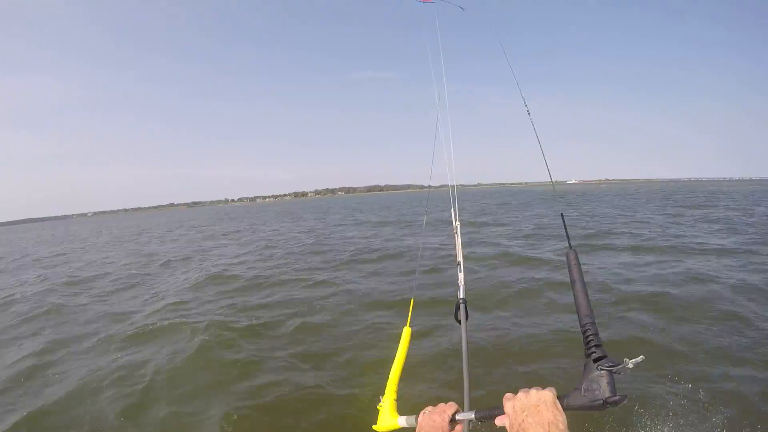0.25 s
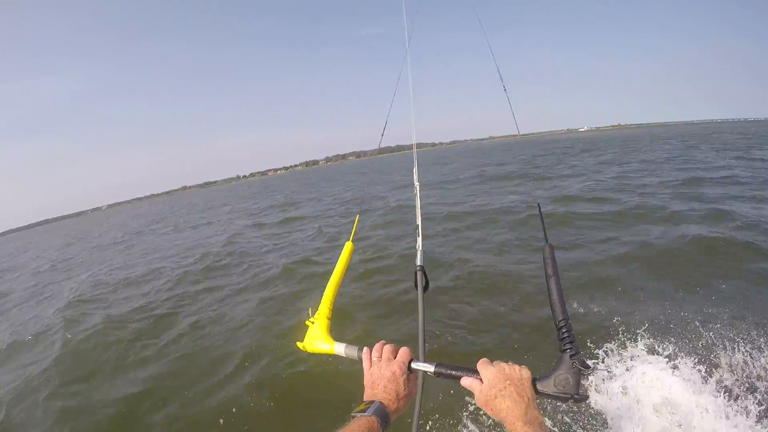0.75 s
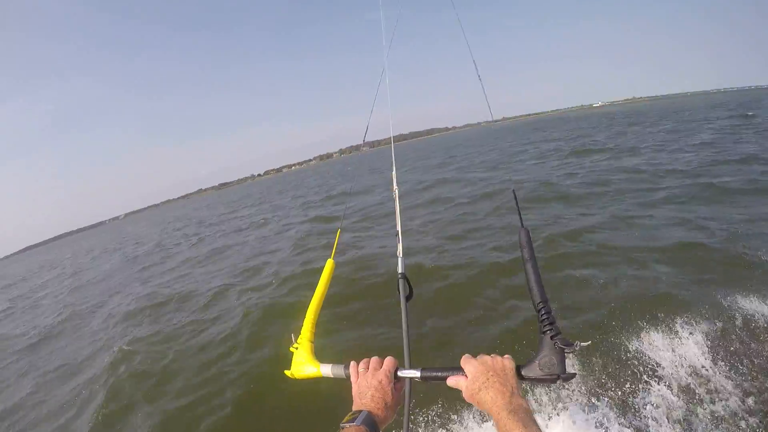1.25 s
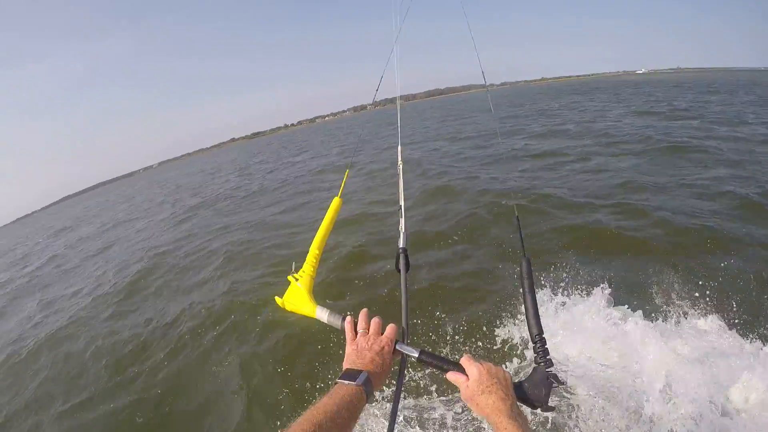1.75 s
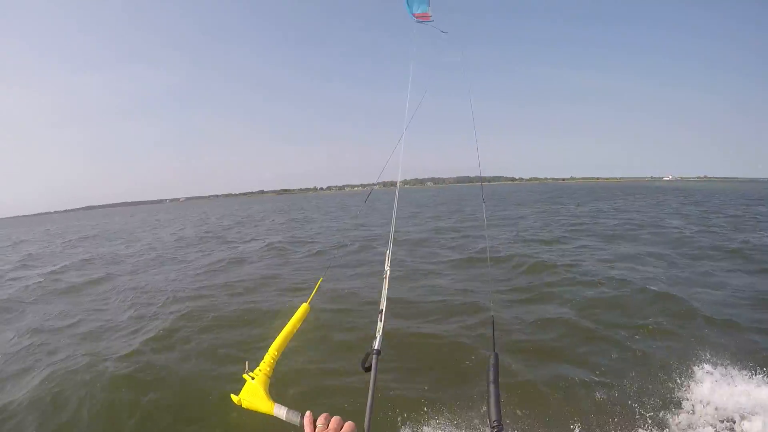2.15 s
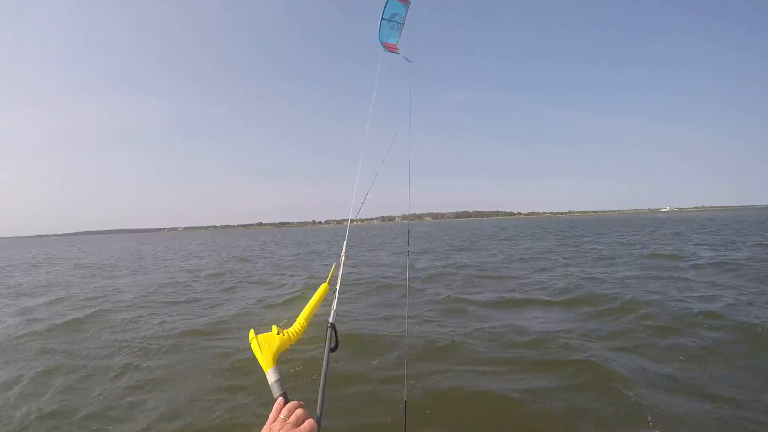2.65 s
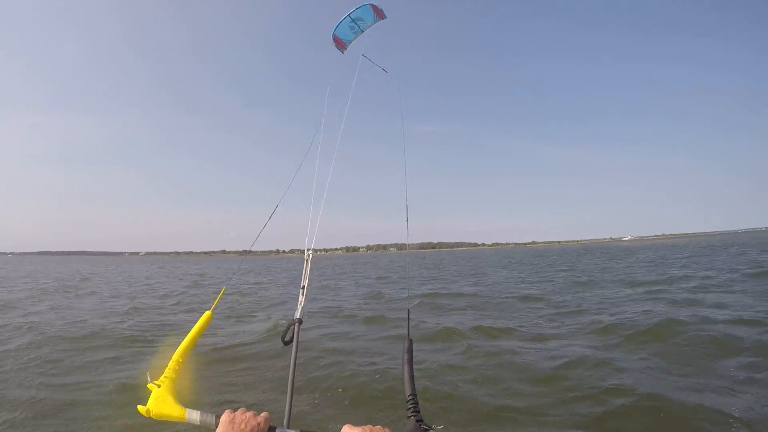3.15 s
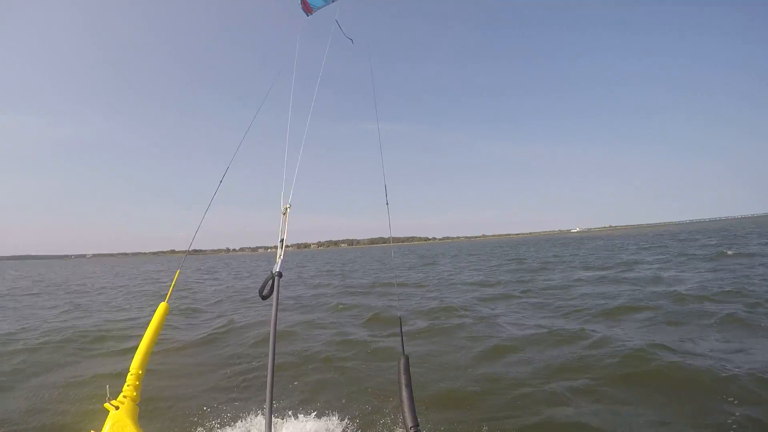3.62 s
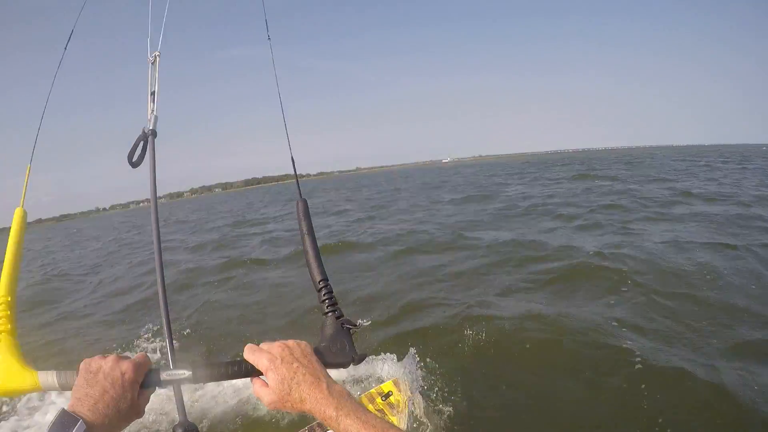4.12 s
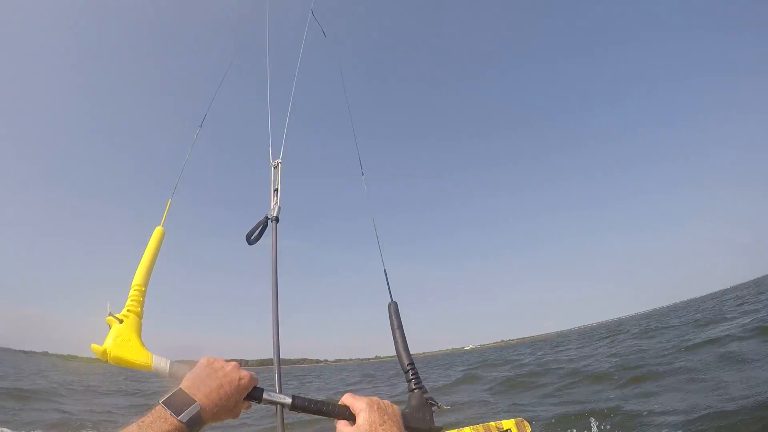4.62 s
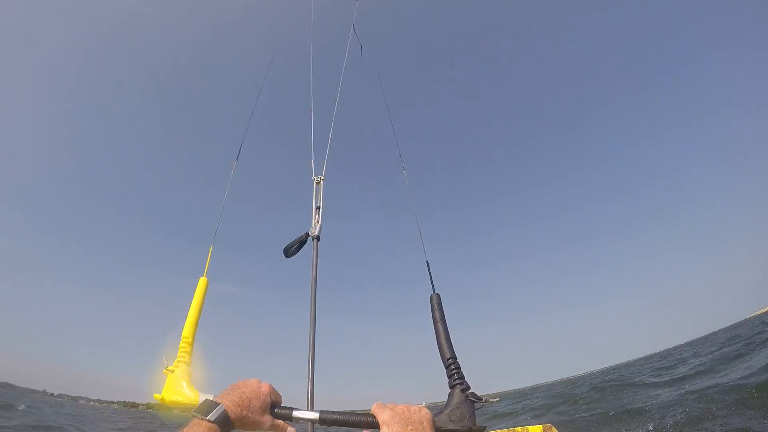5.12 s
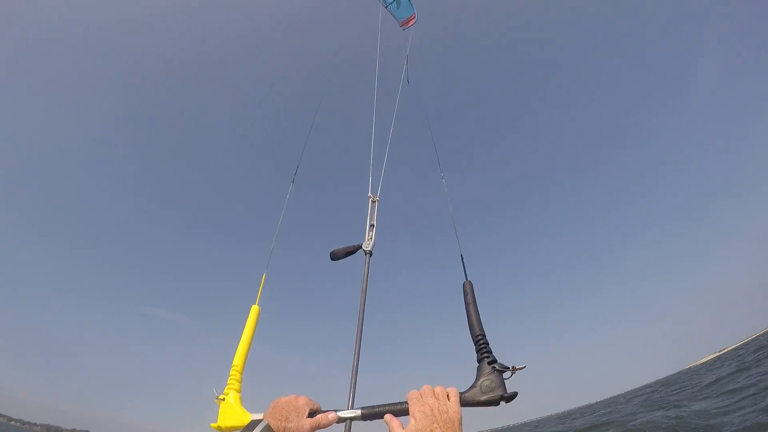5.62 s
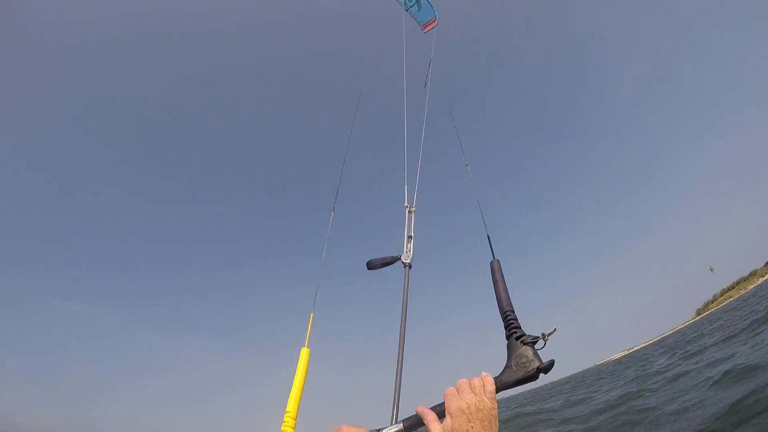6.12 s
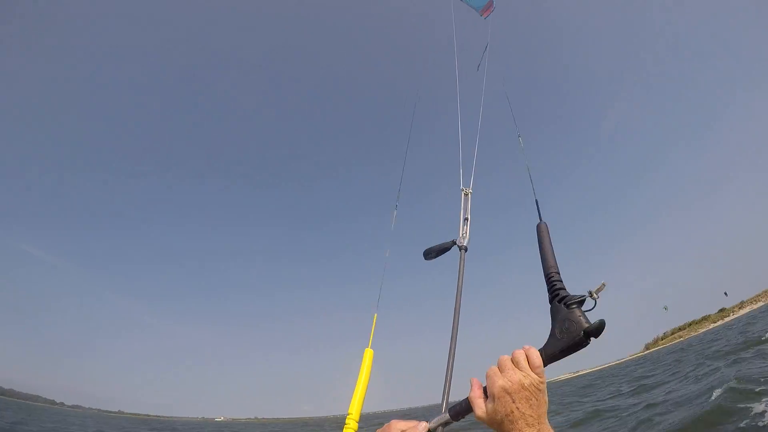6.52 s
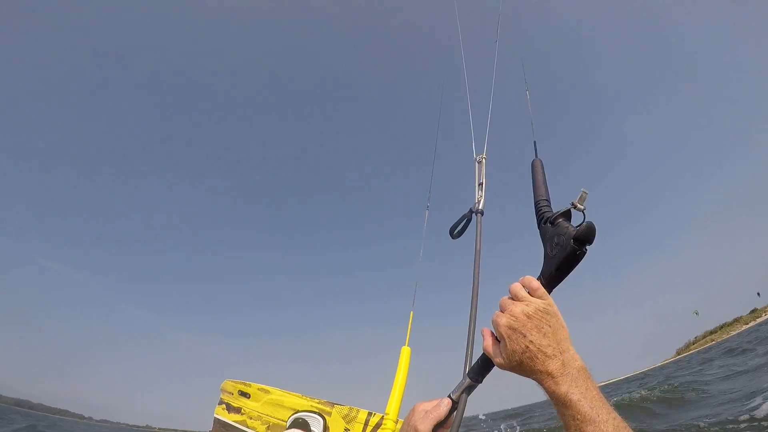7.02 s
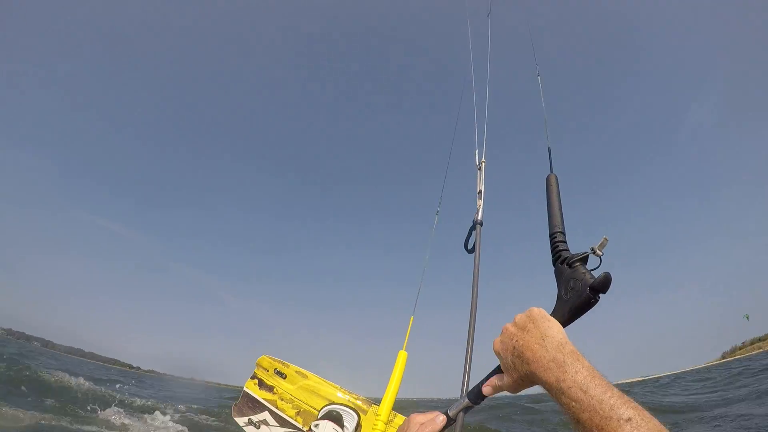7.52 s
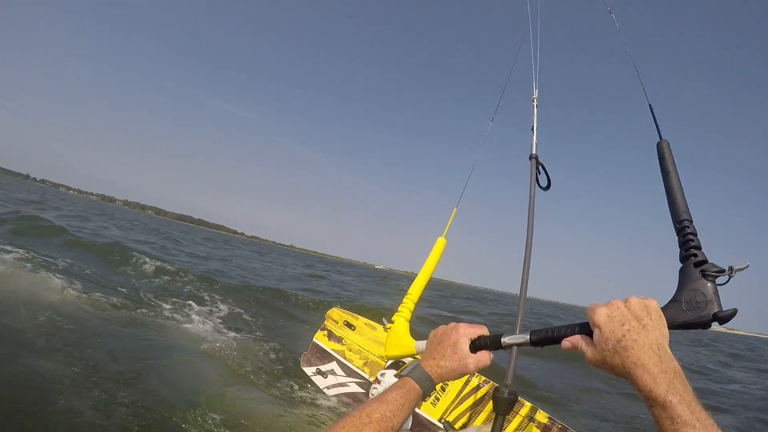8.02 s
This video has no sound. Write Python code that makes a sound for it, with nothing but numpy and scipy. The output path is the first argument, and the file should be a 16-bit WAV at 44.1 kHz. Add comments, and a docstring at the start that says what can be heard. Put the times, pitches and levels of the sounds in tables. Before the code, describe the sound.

Wind rumbles low on an encased microphone as a kiteboard washes and hisses over chop, then spray slaps and patters hard on the case.

```python
"""A kiteboard planes over choppy shallow water, heard from a camera in a waterproof case on the rider.
From the start filtered noise rumbles as wind on the case, under a bubbling wash and hissing spray made of
random impacts that swell at each chop; for the first seconds close spray also excites a narrow case resonance.
Past the middle, decaying sine bubbles plop, two faint slaps land and thin noise ticks prick the wet case.
Near the end sheets of spray hit it: a patter of drops, hard slaps of ringing modes and wet plops."""
import sys
import numpy as np
from scipy import signal
from scipy.fft import rfft, irfft, next_fast_len
from scipy.io import wavfile
from scipy.ndimage import uniform_filter1d

SR = 44100
rng = np.random.default_rng(int(sys.argv[2]) if len(sys.argv) > 2 else 0)


def bounce(signal):
    """Save signal as a 16-bit WAV file at the path given by the first command-line argument."""
    frames = np.transpose(np.atleast_2d(signal))
    limited = np.clip(frames, -1, 1)
    pcm = np.round(limited * 32767).astype(np.int16)
    wavfile.write(sys.argv[1], SR, pcm)


N = 364266
TIME = np.arange(N) / SR


# the board planing between chops, before trims: [t/s, wash level/dB, spray level/dB]
PLANING = [(0.0, -44.5, -42.5), (0.4, -50, -45), (1.7, -48.5, -46.5), (2.3, -48.5, -45.0),
           (3.2, -47.5, -49), (4.4, -45, -48.5), (5.1, -45, -47.5), (5.4, -52, -54.0), (6.0, -49.5, -55),
           (6.5, -48, -54.0), (7.4, -46.0, -51), (7.9, -49.5, -60), (8.26, -46.5, -50.5)]
# chops that the board cuts through: [crest t/s, length/s, wash change/dB, spray change/dB]
CHOPS = [(.19,0.092,1.5,2.5), (.67,.33,8,4.5), (1.11,.31,5.5,6.5), (1.44,0.2,5.5,7.5), (1.87,0.1,9.5,2),
         (2.11,0.36,6.5,6.5), (2.3,0.22,5,1), (2.52,0.28,4,4.5), (2.99,0.53,4.5,1.5), (3.59,0.41,4,2),
         (3.79,.25,5.5,8.5), (4.66,0.081,1.5,2.5), (4.87,0.29,5.5,4.5), (5.61,.13,4.5,5), (5.91,0.28,7,5),
         (6.72,0.046,1,0), (6.9,0.12,3,6), (7.14,0.067,4.5,1.5)]
# low churning under the hull between chops: [t/s, level/dB]
HULL_CHURN = [(0, -49.5), (1.7, -54.5), (2.3, -55), (3.3, -51.5), (4.4, -53.5), (5.0, -49.5), (5.45, -60.5),
              (6.05, -54.5), (6.8, -54.5), (8.26, -54.5)]
# tone of the churning, the wash and the spray through the case: [f/Hz, relative level/dB]
CHURN_COLOUR = [(200, -9), (400, -4), (520, -2), (700, 0), (810, 1), (900, 0), (1020, -1), (1200, -1),
                (1400, -3.5), (2000, -10)]
WASH_COLOUR = [(900, -26), (1300, -7), (1540, 0.5), (1720, -1), (2020, 2.5), (2400, -0.5), (2680, -5),
               (2950, -11.5), (3500, -12), (4500, -25)]
SPRAY_COLOUR = [(2000, -15.5), (2500, 1), (2900, -12.5), (3550, -7), (4350, 2), (5300, -3.5), (6000, -6),
                (6700, 1), (7600, -9), (8600, -13), (9800, -9), (11800, -17.5), (13600, -15.5),
                (15500, -20)]  # also colours the sprinkle
CHURN_FOLLOWS = 0.56  # dB of churning per dB that a chop adds to the wash
# mist level when the spray table and chops sum to the cruise level; dB of mist per dB of spray
MIST_DB, CRUISE_SPRAY_DB, MIST_FOLLOWS = -56, -45, 1.05


def board(wash_trim_db=-1.5, spray_trim_db=0.12, slosh_db=1.0, surge_db=0.24, shimmer_db=1.0,
          churn_bubbles_db=-13, wash_bubbles_db=-8, mist_above_hz=7800):
    """The hull churns water, bubbles burst in the wash and spray rains on the sea, all louder at each chop."""
    wash_change, spray_change = swells(CHOPS)
    wash_db, spray_db = curves(PLANING)
    churn_db, = curves(HULL_CHURN)
    wash_db = wash_db + wash_change + slosh_db * walk(20)
    spray_db = spray_db + spray_change
    churn_db = churn_db + CHURN_FOLLOWS * wash_change + slosh_db * walk(12)
    mist_db = MIST_DB + MIST_FOLLOWS * (spray_db - CRUISE_SPRAY_DB)

    froth = bubbles(count=4000, low_hz=399.5, high_hz=2803, cycles=2.48, spread_db=0.5)
    churn_source = droplets(per_s=3000, spread_db=1.0) + undb(churn_bubbles_db) * froth
    churn = colour(churn_source, CHURN_COLOUR) * undb(churn_db)
    wash_source = droplets(per_s=4000, spread_db=2.5) + undb(wash_bubbles_db) * froth
    wash = colour(wash_source, WASH_COLOUR) * undb(wash_db + wash_trim_db)

    shimmering_drops = droplets(per_s=16000, spread_db=3.0) * undb(shimmer_db * walk(35))
    hiss = colour(shimmering_drops, SPRAY_COLOUR)
    # hard carving tears the spray into a finer mist: the top band grows slightly faster
    high_pass = signal.butter(4, mist_above_hz, "high", fs=SR, output="sos")
    mist = signal.sosfiltfilt(high_pass, hiss)
    coarse_spray = unit(hiss - mist) * undb(spray_db + spray_trim_db)
    spray = coarse_spray + unit(mist) * undb(mist_db)
    return (churn + wash + spray) * undb(surge_db * walk(25))


# sheets of spray that land on the case: [t/s at full level, level/dB, length at full level/s]
SHEETS = [(7.226, -28.5, 0.063), (7.333, -33.5, 0.15), (7.547, -35, 0.033), (7.643, -41, 0.06),
          (7.73, -36.5, 0.066), (7.843, -41.5, 0.033)]
# tone of the drumming on the case: [f/Hz, relative level/dB]
PATTER_COLOUR = [(70, -6), (110, 12), (170, -12), (300, -4), (410, -13), (520, -11), (880, -6),
                 (1270, -8.5), (1500, 0), (1780, -0.5), (2100, 0), (2650, -4), (3300, -17), (6700, -16),
                 (8500, -31), (14000, -40)]
SHEET_ATTACK_S, SHEET_RELEASE_S = 0.02, 0.039  # e-folding times before and after full level
DRIZZLE_DB = -52.5  # the light patter that never stops


def patter(clump_db=2.5, gurgle_db=-6.0):
    """Sheets of spray drum on the case in clumps and gurgle as they run off, over a light, steady drizzle."""
    power = undb(DRIZZLE_DB) ** 2
    for s, db, length in SHEETS:
        before = np.maximum(s - TIME, 0) / SHEET_ATTACK_S
        after = np.maximum(TIME - s - length, 0) / SHEET_RELEASE_S
        envelope = np.exp(-np.minimum(before + after, 20))
        power = power + (undb(db) * envelope) ** 2
    drops = droplets(per_s=1800, spread_db=3.0) * undb(clump_db * walk(140))
    gurgle = bubbles(count=2600, low_hz=507, high_hz=3270, cycles=1.67, spread_db=2.5)
    return colour(drops + undb(gurgle_db) * gurgle, PATTER_COLOUR) * np.sqrt(power)


# big drops slapping the case: [t/s, push level at the crest/dB, time to flatten/s (crest at half of it)]
SLAPS = [(4.915, -36, .003), (4.936, -38, .002), (7.201, -31, 0.0024), (7.223, -17, 0.0039),
         (7.231, -28, 0.0039), (7.242, -21, 0.0067), (7.28, -20, 0.0038), (7.365, -31, 0.0042),
         (7.387, -36, 0.0033), (7.445, -15, 0.003), (7.522, -27.5, 0.004), (7.684, -34, 0.002),
         (7.741, -20, 0.0019), (7.811, -32, 0.0033), (7.891, -31, 0.0023)]
# ringing modes of the case: [f/Hz, relative level/dB, time to fall 60 dB/s]
CASE_MODES = [(900, -31, 0.037), (1590, 6.5, 0.03), (2140, 9, 0.015), (2750, -14, 0.0075),
              (3520, -10, 0.023), (4270, -16, 0.013)]
# tone of the wet splat: [f/Hz, relative level/dB]
SPLAT_COLOUR = [(400, -15), (900, -8), (1600, 3.5), (2300, 4.5), (2950, -1), (3500, -12), (4300, -11),
                (6500, -23), (8500, -50), (15000, -29)]


def slaps(splat_db=1):
    """Each big drop pushes on the case in a ragged burst: a wet splat, and the modes of the case ring."""
    t = TIME[:SR // 20]
    ringing = np.zeros(len(t))
    for hz, db, t60 in CASE_MODES:
        ringing += undb(db - 60 * t / t60) * np.sin(2 * np.pi * hz * t)
    push = np.zeros(N)
    for s, db, flatten in SLAPS:
        swell = 2 * t / flatten * np.exp(1 - 2 * t / flatten)
        add(push, s, undb(db) * swell * rng.choice([-1, 1], len(t)))
    ring = unit(signal.fftconvolve(push, ringing)[:N])
    splat = undb(splat_db) * colour(push, SPLAT_COLOUR)
    return unit(ring + splat) * push.std()  # as strong overall as the push


# drops that trap a pocket of air:
# [t/s, level/dB at the peak before ragging, f/Hz at the loudness peak, midway through the glide]
PLOPS = [(4.645, -31, 2460), (4.795, -26, 2040), (4.857, -31, 2080), (4.916, -29.5, 1570),
         (4.937, -28.5, 2670), (5.027, -44, 290), (5.287, -38, 1530), (5.329, -33.5, 2040),
         (5.602, -36, 2330), (5.672, -35, 1780), (5.810, -35, 2200), (5.943, -36, 2060),
         (6.038, -34.5, 2100), (6.113, -33.5, 1880), (6.203, -37, 2040), (6.711, -32, 1910),
         (7.366, -23.5, 2040), (7.447, -11, 2440), (7.489, -31, 1250), (7.502, -30, 2120),
         (7.519, -22, 2830), (7.557, -23.5, 776), (7.57, -18.5, 1516), (7.665, -30, 2830),
         (7.686, -28.5, 2420), (7.699, -30, 3000), (7.734, -19.5, 1620), (7.742, -26.5, 3500),
         (7.768, -26, 1500), (7.844, -24.5, 895), (7.871, -30.5, 510), (8.03, -34, 1450),
         (8.118, -36, 2010)]


def plops(cycles=2.76, ragged_db=-9):
    """The loudest bubbles, right at the case; the breaking water makes each ring a little ragged."""
    out = np.zeros(N)
    for s, db, hz in PLOPS:
        add(out, s, undb(db) * bubble(hz, cycles))
    return out * (1 + undb(ragged_db) * walk(1200))


# spray thrown up close to the case while the board edges hard: [t/s, level/dB]
CLOSE_SPRAY = [(0, -66), (.45, -54), (.68, -45), (.97, -51.5), (1.46, -55), (2.1, -65), (2.55, -48),
               (2.7, -73)]


def close_spray(ring_hz=2530, width_hz=330):
    """Fine spray close by keeps one resonance of the case sounding."""
    close_db, = curves(CLOSE_SPRAY)
    edges_hz = [ring_hz - width_hz / 2, ring_hz + width_hz / 2]
    mode = signal.butter(2, edges_hz, "band", fs=SR, output="sos")
    ringing = signal.sosfilt(mode, droplets(per_s=6000, spread_db=3.5))
    return unit(ringing) * undb(close_db)


# scattered drops that fall close to the case: [t/s, level/dB]
SPRINKLE = [(0, -68), (4.4, -60), (4.8, -49), (5.3, -59), (5.8, -55), (6.4, -63.5), (7.3, -50),
            (7.95, -60.5), (8.26, -50.5)]


def sprinkle():
    """Single small drops tick close by, each a short high bubble."""
    sprinkle_db, = curves(SPRINKLE)
    ticks = bubbles(count=2200, low_hz=3220, high_hz=11500, cycles=3.5, spread_db=4.0)
    return colour(ticks, SPRAY_COLOUR) * undb(sprinkle_db)


# the tiniest drops, once the case is wet: start, level before the high-pass, e-folding decay
PINPRICKS_FROM_S, PINPRICK_DB, PINPRICK_DECAY_S = 4.5, -40, 0.00054


def pinpricks(count=9, above_hz=8500):
    """Now and then a tiny drop hits the case with a thin, sharp tick of decaying noise."""
    out = np.zeros(N)
    t = TIME[:SR // 200]
    decay = undb(PINPRICK_DB) * np.exp(-t / PINPRICK_DECAY_S)
    for s in rng.uniform(PINPRICKS_FROM_S, TIME[-1], count):
        add(out, s, decay * rng.standard_normal(len(t)))
    return signal.sosfilt(signal.butter(2, above_hz, "high", fs=SR, output="sos"), out)


# the air stream on the case between gusts, before trims: [t/s, slow sway level/dB, buffeting level/dB]
WIND = [(0.0, -30.5, -28), (0.6, -31, -31), (0.85, -29, -34.5), (1.6, -29, -33), (2.3, -30, -36.5),
        (2.85, -34, -40.5), (3.6, -30, -43), (4.3, -27, -35), (5.1, -23, -32), (5.8, -25, -39),
        (6.6, -33.5, -36), (7.0, -21, -37.5), (7.6, -22.5, -33), (8.26, -25, -39)]
# gusts that strike the case: [peak t/s, length/s, sway change/dB, buffeting change/dB]
GUSTS = [(0.71,0.06,-1,13), (1.28,0.095,11.5,1), (1.58,0.26,8.5,-2), (1.75,.04,-5,10.5), (1.99,0.3,12,1.5),
         (2.23,0.088,10,-1), (2.37,0.087,14,5), (2.64,0.34,10.5,4), (2.99,0.096,17.5,0),
         (3.32,0.073,13.5,17), (3.44,0.097,13.5,5), (3.74,0.065,-3,15.5), (4.12,.05,7,4),
         (4.25,0.083,5,6.5), (4.75,0.1,14,2), (5.13,0.085,8.5,2), (5.34,0.044,11,3), (5.47,.07,1,12),
         (6.06,.12,11,3), (6.39,0.36,14.5,3.5), (6.76,0.071,-2,6.5), (7.27,0.29,0.5,16), (7.47,0.086,3,8),
         (7.81,0.21,3,7)]
# fine flutter between gusts, before its trim: [t/s, level/dB]
EDDIES = [(0, -47), (.4, -45.5), (1.2, -46.5), (2.2, -50.5), (3.1, -55.5), (3.6, -51), (4.1, -55),
          (4.95, -51), (5.7, -52.5), (7.0, -53.5), (7.25, -46.5), (7.7, -54), (8.26, -51)]
# tone of the sway, the buffeting and the flutter through the case: [f/Hz, relative level/dB]
SWAY_COLOUR = [(10, -10.5), (16, 1.5), (27, -2.5), (40, -11.5), (52, -14.5), (80, -38)]
WIND_COLOUR = [(32, -17.5), (45, -2), (60, -0.5), (74, -6.5), (90, -14.5), (110, -26.5), (160, -43)]
EDDY_COLOUR = [(80, -15), (115, 2.5), (160, -4), (220, -5.5), (300, -9), (400, -14), (800, -38)]
FLUTTER_FOLLOWS = 0.35  # dB of flutter per dB that gusts and lulls change the buffeting


def wind(flutter_db=2.0, sway_trim_db=-2.0, buffet_trim_db=-1.0, eddies_trim_db=0.13, lull_db=1.4):
    """Large eddies rock the case, middling ones buffet it, small ones flutter on top; gusts move all three."""
    large_db, wind_db = curves(WIND)
    eddy_db, = curves(EDDIES)
    large_change, wind_change = swells(GUSTS)
    wind_change = wind_change + lull_db * walk(14)
    sway = gusts(SWAY_COLOUR, evenness=0.66) * undb(large_db + large_change + sway_trim_db)
    buffet = gusts(WIND_COLOUR, evenness=0.55) * undb(wind_db + wind_change + buffet_trim_db)
    flutter = colour(rng.standard_normal(N) * undb(flutter_db * walk(40)), EDDY_COLOUR)
    flutter_level_db = eddy_db + eddies_trim_db + FLUTTER_FOLLOWS * wind_change
    return sway + buffet + flutter * undb(flutter_level_db)


def gusts(points, evenness):
    """Turbulent pressure as coloured noise; eddies shed in turn are evened out in strength (1 = fully)."""
    pressure = colour(rng.standard_normal(N), points)
    strength = np.sqrt(uniform_filter1d(pressure ** 2, size=3300))  # about 75 ms
    return unit(pressure / strength ** evenness)


def bubble(hz, cycles, glide=0.055):
    """A trapped air pocket swells, rings for a few cycles and rises a little in pitch."""
    age = np.arange(int(8 * cycles * SR / hz)) * hz / (cycles * SR)  # 1 at the peak
    gliding_hz = hz * (1 + glide * np.tanh(age - 1))
    phase = 2 * np.pi * np.cumsum(gliding_hz) / SR
    return age * np.exp(1 - age) * np.sin(phase)


def bubbles(count, low_hz, high_hz, cycles, spread_db):
    """A swarm of bubbles of all sizes at random moments; rms 1."""
    out = np.zeros(N)
    for when, pitch, loudness, length in rng.random((count, 4)):
        size = undb(spread_db * min(-np.log(1 - loudness), 3.5))  # many small, few large
        hz = low_hz * (high_hz / low_hz) ** pitch
        add(out, when * TIME[-1], size * bubble(hz, cycles * (.5 + length)))
    return unit(out)


def droplets(per_s, spread_db):
    """Tiny impacts at random moments, many small and a few large; rms 1."""
    lands = rng.random(N) < per_s / SR
    size = undb(spread_db * np.minimum(rng.exponential(size=N), 5))
    return unit(lands * size * rng.choice([-1, 1], N))


def swells(table):
    """Each event shifts two levels in a smooth bell, each by its own change in dB."""
    out = np.zeros((2, N))
    for s, length, *changes_db in table:
        near = np.abs(TIME - s) < 2 * length
        bell = np.exp(-(2 * (TIME[near] - s) / length) ** 2)
        out[:, near] += np.outer(changes_db, bell)
    return out


def walk(rate):
    """Random levels held 1 / rate s and slewed twice; rms 1."""
    k = int(SR / rate)
    held = np.repeat(rng.standard_normal(N // k + 1), k)
    slewed = uniform_filter1d(uniform_filter1d(held, k), k)
    return unit(slewed[:N])


def colour(x, points):
    """Causal minimum-phase filter with the given (Hz, dB) response; the result has rms 1."""
    size = next_fast_len(N + SR // 2, True) // 2 * 2
    hz, db = np.transpose(points)
    log_hz = np.log(np.maximum(np.arange(size // 2 + 1) * SR / size, 1))
    # past either end the response falls 40 dB per factor e in frequency
    beyond = np.abs(log_hz - np.clip(log_hz, np.log(hz[0]), np.log(hz[-1])))
    gain_db = np.maximum(np.interp(log_hz, np.log(hz), db) - 40 * beyond, -100)
    # folding the cepstrum onto positive time makes the filter causal
    cepstrum = irfft(np.log(undb(gain_db)))
    cepstrum[1:size // 2] *= 2
    cepstrum[size // 2 + 1:] = 0
    response = np.exp(rfft(cepstrum))
    return unit(irfft(rfft(x, size) * response)[:N])


def curves(table):
    """The columns of a timed table, one value a sample."""
    s, *columns = np.transpose(table)
    return [np.interp(TIME, s, c) for c in columns]


def add(out, s, sound):
    """Mix a short sound in at time s."""
    i = int(s * SR)
    out[i:i + len(sound)] += sound[:N - i]


def undb(db):
    """Decibels to gain."""
    return 10 ** (np.asarray(db) / 20)


def unit(x):
    """Scale to rms 1."""
    return x / np.sqrt(np.mean(x ** 2))


def scene():
    """Board, the water that hits the case, and wind, in open air."""
    on_case = patter() + slaps() + plops() + pinpricks()
    near_case = close_spray() + sprinkle()
    return (board() + on_case + near_case + wind())[None]


# narrow bands that the wall of the case cuts or lifts: [f/Hz, width/Hz, level change/dB]
CASE_BANDS = [(1180, 190, -1.5), (1706, 115, -4), (2980, 200, 1), (6230, 210, -2.5), (9270, 440, -2)]
TOP_HZ = 15300


def record(dry):
    """The case reshapes a few narrow bands and the camera cuts the top."""
    for hz, width, db in CASE_BANDS:
        b, a = signal.iirpeak(hz, hz / width, fs=SR)
        dry = dry + (undb(db) - 1) * signal.lfilter(b, a, dry)
    return signal.sosfilt(signal.ellip(10, .2, 80, TOP_HZ, fs=SR, output="sos"), dry)


dry = scene()
out = record(dry)
bounce(out)
```